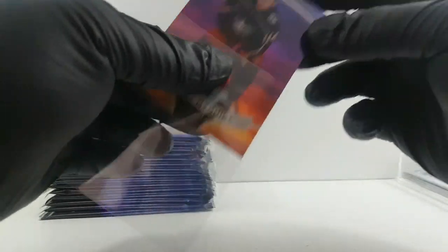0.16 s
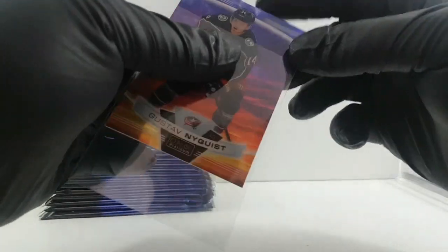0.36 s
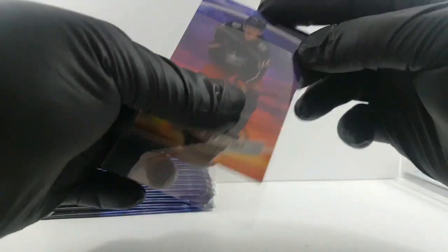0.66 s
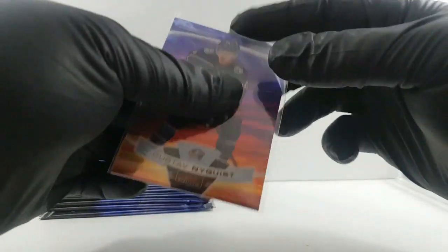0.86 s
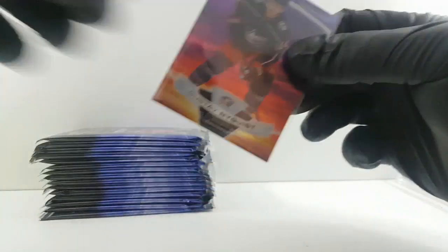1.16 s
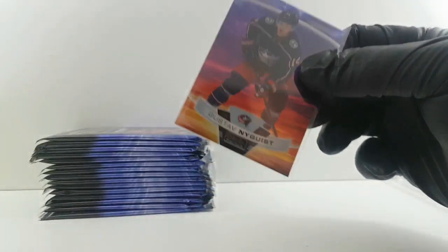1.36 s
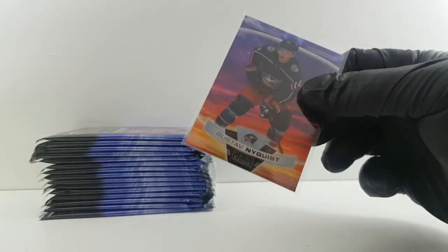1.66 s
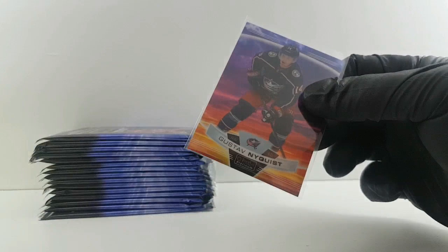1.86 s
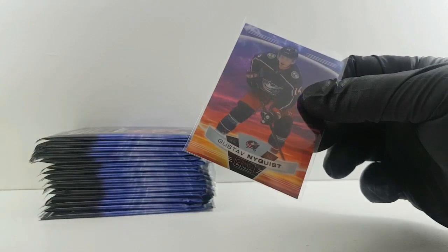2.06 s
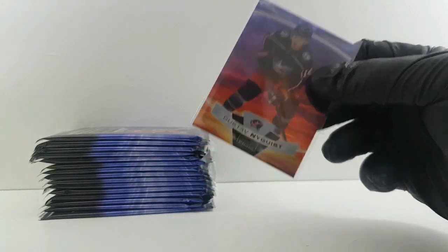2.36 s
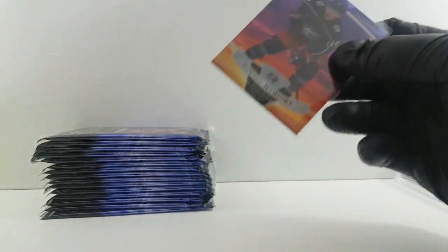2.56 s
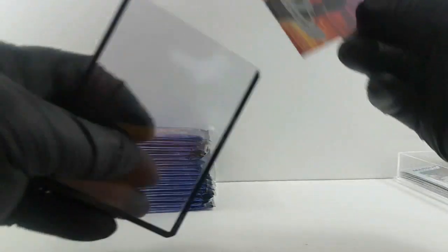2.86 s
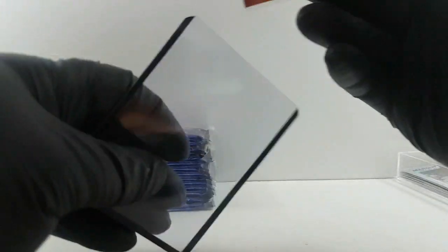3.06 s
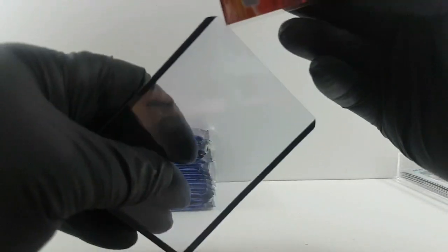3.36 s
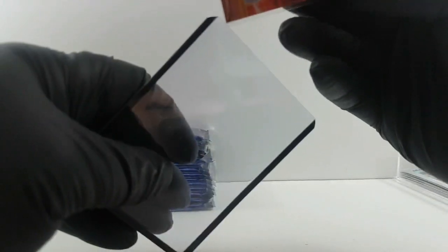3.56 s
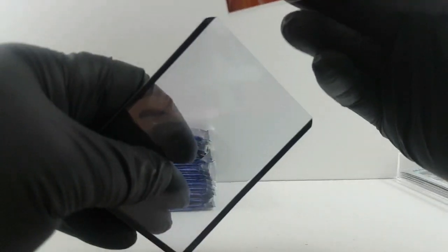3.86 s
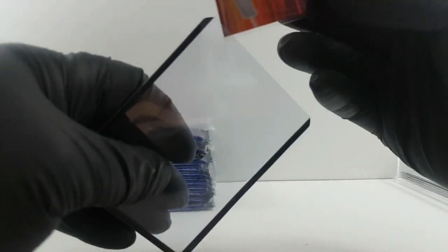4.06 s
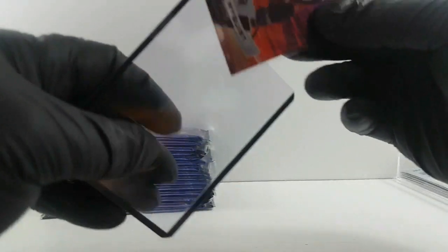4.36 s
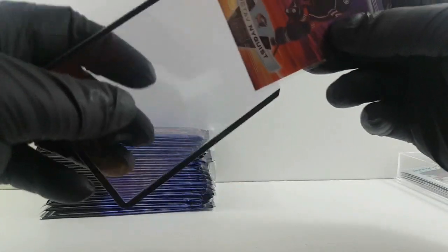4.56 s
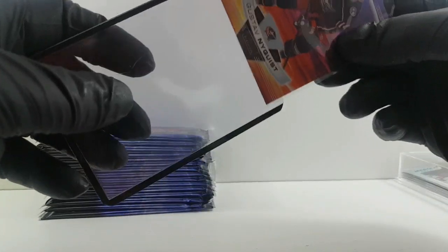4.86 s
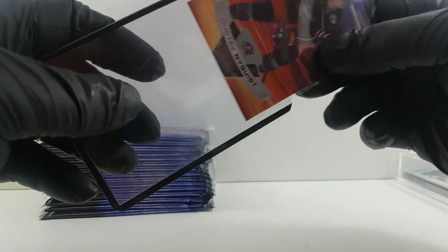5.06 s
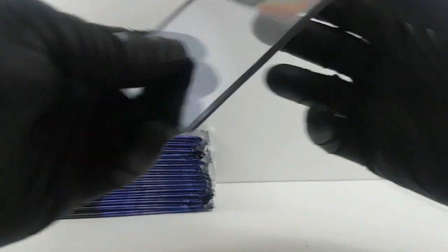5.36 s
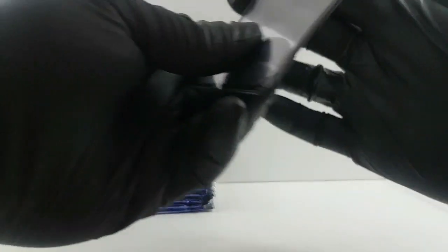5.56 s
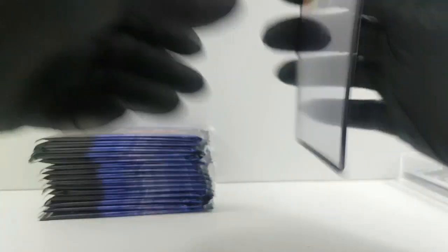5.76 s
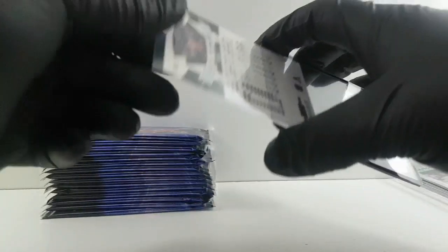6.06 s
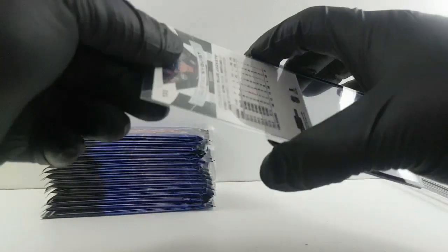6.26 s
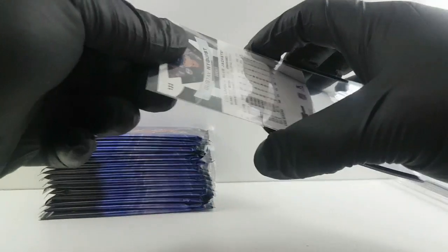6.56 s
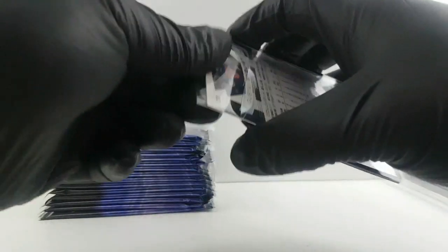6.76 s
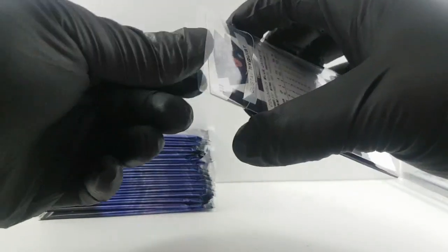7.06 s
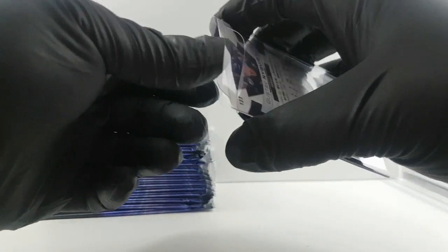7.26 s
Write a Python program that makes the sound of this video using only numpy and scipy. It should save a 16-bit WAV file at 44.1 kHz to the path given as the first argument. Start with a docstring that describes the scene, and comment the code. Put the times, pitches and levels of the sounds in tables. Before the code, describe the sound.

Gloved hands handle a card in thin plastic very close to a phone microphone. Crisp edge ticks and soft low thumps come first, then a busy patch of crackly sliding film around two seconds. A hard holder knocks sharply at about three seconds, followed by near quiet. Handling resumes after five seconds with rustles, clicks and another firm knock near the end. Quiet room air and a faint low rumble lie beneath.

```python
"""A small display booth: gloved hands work close to a phone with two microphone ports, a quiet room behind.
A card goes into a thin sleeve and a hard clear holder is handled. Bursts of tiny slips make the edge ticks;
damped pushes and ringing modes make the knocks, sagging sines the soft fingertip thumps, gliding sines the
squeaks, and streams of slips the sliding plastic. Dense echoes come off the booth walls within milliseconds.
Still air, a low rumble of moving arms and a faint high whine lie underneath."""
import sys
import numpy as np
from scipy import signal
from scipy.fft import rfft, irfft, next_fast_len
from scipy.io import wavfile
from scipy.ndimage import uniform_filter1d

SR = 44100
rng = np.random.default_rng(int(sys.argv[2]) if len(sys.argv) > 2 else 0)


def output_pcm(signal):
    """Save a mono or channel-first signal as 16-bit PCM at the path in sys.argv[1].

    Samples are clipped to [-1, 1] before scaling.
    """
    pcm = np.clip(np.atleast_2d(signal).T, -1, 1) * 32767
    wavfile.write(sys.argv[1], SR, np.round(pcm).astype(np.int16))


N = 327706  # samples in the scene
RING = 4096  # samples in a short sound
AGE = np.arange(RING) / SR  # s since a short sound began


def undb(db):
    """Amplitude ratio for a level in dB."""
    return np.exp(np.asarray(db) * np.log(10) / 20)


def panned(db):
    """Left and right gains for a left-minus-right level difference."""
    return undb(np.array([[db], [-db]]) / 2)


def level(x, db, size=None):
    """Scales x so that its first size samples have this rms level."""
    return x * undb(db) / np.sqrt(np.mean(x[..., :size] ** 2))


def fade(t, t60):
    """Exponential decay by 60 dB in t60 seconds."""
    return undb(-60 * t / t60)


def add(out, s, x):
    """Mixes a short sound in at time s."""
    i = max(int(s * SR), 0)
    out[:, i:i + x.shape[1]] += x[:, :N - i]


def through(x, response):
    """Convolution, cut to the length of x."""
    x = np.atleast_2d(x)
    size = next_fast_len(x.shape[1] + np.shape(response)[-1], True)
    return irfft(rfft(x, size) * rfft(response, size), size)[:, :x.shape[1]]


def band(x, lo, hi, order=3):
    """Butterworth high-pass and low-pass, applied as a causal spectrum."""
    size = next_fast_len(x.shape[-1] + 1024, True)
    s = 1j * (np.arange(size // 2 + 1) + 1e-6) * SR / size
    slope = 1
    for pole in signal.buttap(order)[1]:
        slope = slope * (s / hi - pole) * (lo / s - pole)
    return irfft(rfft(x, size) / slope, size)[..., :x.shape[-1]]


def colour(points, size=512):
    """Causal responses, one for each level column of the (f/Hz, level/dB, ..) points."""
    hz, *columns = np.transpose(points)
    f = np.maximum(np.arange(size // 2 + 1) * SR / size, 1)
    log_gains = np.log(undb([np.interp(np.log(f), np.log(hz), c) for c in columns]))
    # folding the cepstrum onto positive time gives minimum phase
    cepstrum = irfft(log_gains)
    cepstrum[:, 1:size // 2] *= 2
    cepstrum[:, size // 2 + 1:] = 0
    return irfft(np.exp(rfft(cepstrum)))


def smooth_noise(count, *widths):
    """Slow random wander of unit rms: noise averaged over each width in samples."""
    wander = rng.standard_normal(count)
    for width in widths:
        wander = uniform_filter1d(wander, size=width)
    return level(wander, 0)


def diffuse(size, split_hz=550):
    """Stereo noise whose bass is alike on both sides."""
    mid, side = rng.standard_normal((2, size))
    keep = np.exp(-2 * np.pi * split_hz / SR)
    side = signal.lfilter([keep, -keep], [1, -keep], side)
    return np.array([mid + side, mid - side]) / np.sqrt(2)


def slips(size, spread_db):
    """Tiny stick-slip releases of unit rms: many weak ones and a few strong."""
    strength = undb(spread_db * np.minimum(rng.exponential(size=size), 6))
    return level(rng.choice([-1, 1], size) * strength, 0)


def booth(echo_db, t60, lag=0):
    """The direct sound, then dense echoes off the near walls, drawn afresh for each place of the hands."""
    onset = np.clip((AGE - .001) / 0.00024, 0, 1)
    echoes = diffuse(RING) * fade(AGE, t60) * onset
    response = echoes * undb(echo_db) / np.sqrt(np.sum(echoes ** 2) / 2)
    # a positive lag in samples delays the direct sound on the right, a negative one on the left
    lag = int(round(lag))
    response[0, max(-lag, 0)] += 1
    response[1, max(lag, 0)] += 1
    return response


# colour of the booth and the two microphone ports: f/Hz, left level/dB, right level/dB
PORT_COLOUR = [(930, -3, -4), (1466, -7.5, -6), (1900, -1, 0), (2723, -1.5, -7), (3670, -3, 5),
               (4340, 12.5, 1), (4540, -7, 12.5), (5060, 10.5, 6.5), (6000, 15.5, 10.5), (6210, 14, -4.5),
               (6640, 6, -5.5), (7570, -4.5, -13.5), (8650, -14.5, -7), (9760, 4.5, -12), (10750, -0.5, 6),
               (12000, -0.5, 0), (12000, -13.5, -1.5), (15900, -7.5, -7.5)]


def microphone_ports():
    """Booth and port resonances as heard at each side of the phone."""
    return colour(PORT_COLOUR)


# spectrum of the quiet room, relative until ROOM_DB sets the whole: f/Hz, level/dB per Hz
ROOM_SPECTRUM = [(20, 11.5), (50, -8), (90, -7.5), (170, -3), (260, -3.5), (450, -2), (640, 0),
                 (1000, -9.5), (2100, -10.5), (3400, -14), (5000, -16.5), (6000, -17), (8300, -24),
                 (11000, -18.5), (15500, -17)]
ROOM_DB = -67
# arms moving about the table: t/s, rumble level/dB
ARM_RUMBLE = [(0.0, -67), (2.35, -67.5), (3.3, -81.5), (4.6, -104), (5.3, -82.5), (6.86, -70.5),
              (7.4, -104)]


def background():
    """Still room air as coloured noise, and low-passed noise for the rumble of the moving arms."""
    air = level(through(diffuse(N, split_hz=93), colour(ROOM_SPECTRUM, size=8192)), ROOM_DB)
    swell = undb(np.interp(np.arange(N) / SR, *np.transpose(ARM_RUMBLE)))
    return air + swell * level(band(diffuse(N, split_hz=16), 46, 184, order=2), 0)


# a faint electronic whine, the values joined by straight lines: t/s, f/Hz, peak level/dB
WHINE_PATH = [(0, 15900, -98), (3.3, 15680, -82.5), (7.4, 15200, -83)]


def whine():
    """A thin, wavering sine at the edge of hearing that slowly sinks in pitch."""
    s, *columns = np.transpose(WHINE_PATH)
    hz, db = (np.interp(np.arange(N) / SR, s, c) for c in columns)
    waver_hz = 40 * smooth_noise(N, 300)
    return undb(db) * np.sin(2 * np.pi * np.cumsum(hz + waver_hz) / SR)


# strokes of plastic over plastic or glove: start t/s, length t/s,
# then gains at full speed: hiss (about 5.5-8.5 kHz) level/dB, scrape (about 0.4-3.4 kHz) level/dB,
# sheen (above about 10 kHz) level/dB
SLIDING_STROKES = [(0, 0.087, -66.5, -70, -67), (0.133, 0.083, -52.5, -65, -54),
                   (0.17, 0.21, -65, -72, -63), (0.467, 0.19, -68.5, -75, -69), (0.67, 0.15, -62, -68, -58),
                   (0.989, 0.26, -60.5, -61, -61.5), (1.215, 0.4, -70, -76, -72.5),
                   (1.716, 0.083, -63, -62.5, -66), (1.74, 0.49, -63, -64.5, -68.5),
                   (1.799, 0.067, -50.5, -55.5, -51), (1.844, 0.023, -58, -45.5, -53),
                   (1.899, .1, -59, -56, -61), (1.993, 0.066, -58.5, -60, -62),
                   (2.099, 0.042, -50, -56, -55), (2.158, 0.2, -55, -56.5, -57.5),
                   (2.208, 0.063, -42, -71, -41.5), (2.334, .18, -58, -68, -58),
                   (2.478, .14, -52.5, -61, -55), (2.575, 0.33, -65, -68.5, -65.5),
                   (2.797, 0.16, -58, -60.5, -59.5), (3.005, .14, -60.5, -66.5, -61.5),
                   (3.084, 0.44, -79, -73.5, -87), (4.22, 0.44, -63.5, -77, -63),
                   (4.895, 0.41, -59, -73, -56.5), (5.267, 0.15, -56, -62.5, -59),
                   (5.393, 0.21, -65, -67.5, -66), (5.611, 0.14, -58, -66.5, -58.5),
                   (5.654, 0.087, -54, -54, -52.5), (5.719, 0.078, -49, -47, -48.5),
                   (5.758, 0.26, -63.5, -71, -64.5), (6.046, 0.084, -63.5, -62.5, -65),
                   (6.271, 0.12, -66, -69.5, -67), (6.573, .1, -57, -60, -59.5),
                   (6.631, 0.33, -55.5, -61, -56), (7.151, .19, -57.5, -58.5, -60.5),
                   (7.306, 0.46, -60, -65.5, -62)]
# share of a stroke in which the hand speeds up; loudness is a power of its speed
SWELL_SHARE, SPEED_POWER = 0.4, 0.88


def stroke_gains():
    """Hiss, scrape and sheen over time: each stroke swells and dies away with the speed of the hand."""
    t = np.arange(N) / SR
    gains = np.zeros((3, N))
    for start, length, *db in SLIDING_STROKES:
        u = t[:int(length * SR)] / length
        speed = np.sin(np.pi * np.interp(u, [0, SWELL_SHARE, 1], [0, .5, 1]))
        add(gains, start, undb(db)[:, None] * speed ** SPEED_POWER)
    return gains


# ringing modes of the hard holder, before detuning, levels relative: f/Hz, level/dB, 60 dB decay t/s
HOLDER_MODES = [(205, -19, .08), (356, -12, .07), (440, -4, .06), (464, 0, .08), (582, -6, .09),
                (680, -13, .1), (760, -14, .07), (865, -12, .08), (1060, -16, .08), (1150, -13, .09),
                (1420, -17, .07), (1750, -15, .09), (1870, -11, .05), (2280, -20, .08)]


def holder_ring():
    """The holder's decaying modes, a little detuned by each new grip; unit energy."""
    hz, db, t60 = np.transpose(HOLDER_MODES)[:, :, None]
    hz = hz * (1 + 0.018 * rng.standard_normal(hz.shape))
    ring = np.sum(undb(db) * fade(AGE, t60) * np.sin(2 * np.pi * hz * AGE), axis=0)
    return ring / np.sqrt(np.sum(ring ** 2))


def rubbing(ports, gains, judder_db=1.5, uneven_db=1.24, grain_db=5, scatter_t60=0.063):
    """Sliding plastic: a juddering stream of slips hisses off the film and sounds the holder."""
    hiss, scrape, sheen = gains
    judder = smooth_noise(N, 260, 130)
    force = slips(N, grain_db) * undb(judder_db * judder)
    pressure = undb(uneven_db * smooth_noise(N, 900, 500))
    # the contact point keeps moving, so each slip scatters off the walls in its own way
    scattered_energy = np.abs(through(force ** 2, fade(AGE, scatter_t60) ** 2))
    grains = pressure * diffuse(N) * np.sqrt(scattered_energy)
    film = through(grains, ports)
    plate = grains + undb(-10) * through(grains, holder_ring())
    return (hiss * level(band(film, 5500, 8540), 0)
            + sheen * level(band(film, 10250, 18000, order=5), 0)
            + scrape * level(band(plate, 445, 3420, order=2), 0))


THUMP_LAG = 14  # samples by which a thump's direct sound reaches the right port later


def thump(db, hz, scuff_db, t60=0.057, scuff_t60=0.025, flutter_db=-6, sag=0.062):
    """A fingertip flexes the plastic, its pitch sagging through hz; the glove flutters and scuffs."""
    sagging_hz = hz * (1 + sag * (2 * np.exp(-AGE / 0.0054) - 1))
    phase = 2 * np.pi * np.cumsum(sagging_hz) / SR
    press = 1 - np.exp(-AGE / 0.00099)
    flutter = level(band(diffuse(RING, split_hz=170), 31, 264), flutter_db)
    flexing = (np.sin(phase) + flutter) * press * fade(AGE, t60)
    flex = through(flexing, booth(echo_db=-3, t60=0.21, lag=THUMP_LAG))
    scuffing = slips(RING, 7.5) * press * fade(AGE, scuff_t60)
    scuff = through(scuffing, booth(echo_db=13.0, t60=0.066) + undb(-1) * holder_ring())
    return level(flex, db, size=880) + level(band(scuff, 576, 425, order=2), scuff_db, size=880)


# fingertips landing on the held plastic: t/s, flex level/dB, mid-sag f/Hz, scuff level/dB
FINGERTIPS = [(0.044, -66, 210, -63), (0.132, -57.5, 276, -62), (0.559, -54, 226, -65.5),
              (0.593, -57, 203, -69), (0.82, -53, 226, -77), (0.992, -45, 288, -36),
              (1.007, -35.5, 219, -52), (1.18, -48.5, 200, -57.5), (1.816, -45.5, 217, -59),
              (1.833, -37, 198, -46), (1.853, -48, 246, -41.5), (1.911, -44, 217, -47),
              (1.944, -36, 243, -48), (1.957, -31.5, 244, -41), (2.016, -44.5, 300, -50),
              (2.043, -51, 300, -53), (2.109, -56.5, 358, -49.5), (2.306, -37.5, 291, -42.5),
              (2.344, -35.5, 182, -67), (2.84, -40, 335, -47), (2.993, -52.5, 360, -59),
              (3.157, -57, 208, -79), (3.682, -51, 217, -68), (5.165, -56.5, 218, -59),
              (5.193, -46, 382, -39), (5.205, -48, 233, -50), (5.329, -57.5, 216, -80),
              (5.766, -56.5, 383, -49), (5.971, -62, 245, -66), (6.043, -53, 390, -42.5),
              (6.06, -43.5, 222, -48.5), (6.245, -62, 195, -84), (6.327, -45.5, 358, -41.5),
              (6.843, -48.5, 218, -68)]
# each settles a moment (s) after landing, softer (dB) and lower (pitch ratio)
SETTLE_S, SETTLE_DB, SETTLE_PITCH = 0.025, -10.5, 0.754


def thumps(settle_scuff_db=-14):
    """Each fingertip lands on the plastic, then settles with a second, softer flex."""
    out = np.zeros((2, N))
    for s, db, hz, scuff_db in FINGERTIPS:
        add(out, s, thump(db, hz, scuff_db))
        settled = thump(db + SETTLE_DB, hz * SETTLE_PITCH, scuff_db + settle_scuff_db)
        add(out, s + SETTLE_S, settled)
    return out


ONSET_S = .01  # where the onset lies within a tick, s


def tick(ports, edge_db, body_db, sheen_db, length, pan, grain_db=4, swell_db=-17, swell_s=0.00042):
    """A plastic edge slips in a short flurry, with a faint, very short swell of noise around its onset."""
    rise = np.maximum(AGE - ONSET_S, 0) / length
    swell = undb(swell_db) * np.exp(-np.abs(AGE - ONSET_S) / swell_s)
    force = slips(RING, grain_db) * (rise * np.exp(1 - rise) + swell)
    flurry = through(through(force, booth(echo_db=1.5, t60=0.06)), ports) * panned(pan)
    return (level(band(flurry, 6050, 5750, order=4), edge_db, size=880)
            + level(band(flurry, 1125, 3300), body_db, size=880)
            + level(band(flurry, 7370, 21000, order=5), sheen_db, size=880))


# ticks of the sleeve edges: onset t/s, edge (around 6 kHz) level/dB, body (about 1.1-3.3 kHz) level/dB,
# sheen (above about 7.4 kHz) level/dB, slip length t/s, left minus right level/dB
SLEEVE_TICKS = [(0.13, -66, -63, -65, .0028, 3), (0.252, -76, -88, -66, 0.0011, -10),
                (0.695, -61.5, -71, -55, 0.0029, -6), (0.796, -43.5, -59, -38.5, .0022, -1),
                (0.8036, -39, -62.5, -45, 0.001, 2), (0.901, -31.5, -47.5, -44, 0.002, 12),
                (0.9027, -36.5, -44.5, -38, .0013, -7), (0.991, -46.5, -44, -61, 0.0017, 4),
                (1.114, -66, -64, -75, .002, 2), (1.171, -53, -56, -58, 0.0031, 5),
                (1.614, -56.5, -65, -68, 0.0076, 0.5), (1.639, -54, -56.5, -58, 0.00091, 5),
                (1.804, -51.5, -51, -73, 0.0016, 2), (1.906, -49.5, -56, -55, 0.00056, 4),
                (1.944, -47.5, -49.5, -57, 0.0028, 2), (1.978, -50, -54, -57, 0.0014, 6),
                (2.197, -44, -58, -52, 0.00045, 3), (2.303, -45.5, -45, -54.5, 0.0016, 4),
                (2.878, -44.5, -75, -51, 0.0005, 1), (2.962, -38.5, -49, -40.5, 0.00093, -4),
                (3.025, -56.5, -89, -60.5, 0.00048, -3), (5.2183, -49, -55, -54, 0.0027, -3),
                (5.325, -51.5, -61, -50.5, 0.00091, 10), (5.761, -41.5, -47.5, -45.5, 0.0024, -3),
                (6.073, -59, -61.5, -54, .0027, -8), (6.13, -64, -65.5, -68, 0.0023, 0),
                (6.177, -67.5, -68, -84, .0015, 4), (6.331, -47, -40, -38.5, 0.002, -2),
                (6.358, -42, -50, -38.5, 0.00051, -1), (7.035, -45, -55.5, -45.5, 0.0045, -0.5),
                (6.412, -62, -63, -58.5, 0.00092, -10), (6.77, -56, -53, -63, 0.0024, -2),
                (6.913, -70, -69, -67, 0.0012, 0), (7.229, -52, -63, -55.5, 0.00057, -2)]


def ticks(ports):
    """The sleeve's distinct ticks; each has its own brightness."""
    out = np.zeros((2, N))
    for s, *flurry in SLEEVE_TICKS:
        add(out, s - ONSET_S, tick(ports, *flurry))
    return out


# body and sheen of a click or crinkle relative to its edge, dB
CLICK_BODY_DB, CLICK_SHEEN_DB = -4, -6
# stray crinkles: how often, and level relative to the sliding hiss gain
CRINKLES_PER_S, CRINKLE_DB = 3.8, -2
# light shifts of the grip: how often, and level relative to the arms' rumble
TOUCHES_PER_S, TOUCH_DB = 4, 6


def fidgets(ports, hiss, touch_hz=205, touch_scuff_db=-11, crinkle_s=0.0017):
    """At random, edge slips crinkle the sliding sleeve and soft flexes follow the arms as the grip shifts."""
    out, duration = np.zeros((2, N)), N / SR
    for when, pan in rng.random((int(CRINKLES_PER_S * duration), 2)):
        crinkle = tick(ports, 0, CLICK_BODY_DB, CLICK_SHEEN_DB, crinkle_s, 10 * (pan - .5))
        add(out, when * duration, crinkle * undb(CRINKLE_DB) * hiss[int(when * N)])
    for when, pitch in rng.random((int(TOUCHES_PER_S * duration), 2)):
        db = np.interp(when * duration, *np.transpose(ARM_RUMBLE)) + TOUCH_DB
        hz = touch_hz * 2 ** (pitch - .5)  # within half an octave either way
        add(out, when * duration, thump(db, hz, db + touch_scuff_db))
    return out


# knocks on the holder: t/s, level/dB, contact f/Hz, rattle level/dB relative to the push,
# edge click level/dB, left minus right level/dB, lag of the right port/samples
HOLDER_KNOCKS = [(0.7674, -48, 680, -25, -49.5, 0, 11.5), (0.904, -57, 590, -20, -73, -2, 3),
                 (1.083, -49, 646, -27, -55.5, 0, 5), (1.669, -57, 710, -10, -66.5, -2, 12.5),
                 (2.635, -56, 514, -21, -69, 1, 11), (2.77, -56, 696, -7, -63, 0, 16),
                 (2.833, -35, 573, 0.5, -50, -1.5, 12.5), (3.0645, -24.5, 834, -8.5, -62, -0.5, 13),
                 (3.1923, -45.5, 850, -8.5, -57, 0, 9.5), (3.27, -58, 700, -16, -82, -2, 15),
                 (3.927, -51.5, 595, -19, -58, 1.5, 15), (4.534, -61.5, 650, -19, -78, -3, 2),
                 (4.719, -62.5, 830, -26, -54, 0.5, -4), (4.797, -61.5, 960, -5, -65, -1, 5),
                 (5.192, -38, 624, 4, -47.5, -1, 13), (5.696, -48, 970, -20, -51, -1, -8),
                 (6.329, -36, 574, 0, -58, 1, -3), (6.419, -57.5, 1150, -8, -60.5, 2, -7),
                 (6.607, -51.5, 1320, -20, -44.5, 0.5, -18), (6.744, -28.5, 960, -9.5, -59, 0.5, -9.5),
                 (6.822, -44, 2000, -18, -47, 2, -1.5), (6.84, -42, 900, -3, -51, 3, -10)]
CLICK_S = 0.00078  # slip length of the click that starts a knock, s


def knocks(ports, cycles=0.23, ring_db=-5, ring_delay=0.0022, low_hz=170):
    """An edge clicks, pushes the holder briefly and rattles; the whole plate takes up the ring a moment later."""
    out = np.zeros((2, N))
    for s, db, hz, rattle_db, click_db, pan, lag in HOLDER_KNOCKS:
        turn = hz * AGE
        push = level(turn ** 3 * np.exp(-turn / cycles) * np.sin(2 * np.pi * turn), 0)
        rattling = slips(RING, 7) * AGE * fade(AGE, 0.015)
        rattle = level(band(rattling, 1250, 2000, order=5), rattle_db)
        strike = through(push + rattle, booth(echo_db=-2.0, t60=0.051, lag=lag))
        # a shorter, higher contact drives the deep modes less
        swell = 1 - np.exp(-(AGE / ring_delay) ** 2)
        driven_modes = band(holder_ring() * swell, 0.55 * hz, 5000, order=2)
        ring = through(driven_modes, booth(echo_db=0, t60=0.0083, lag=lag))
        struck = band(level(strike, 0) + level(ring, ring_db), low_hz, 7200, order=1)
        knock = through(struck, ports) * panned(pan)
        click = tick(ports, click_db, click_db + CLICK_BODY_DB, click_db + CLICK_SHEEN_DB, CLICK_S, pan)
        start = s - .0007
        add(out, start, level(knock, db, size=440))
        add(out, start - ONSET_S, click)
    return out


# glove squeaks on the plastic: t/s, length t/s, start f/Hz, end f/Hz, level/dB
GLOVE_SQUEAKS = [(2.015, 0.035, 1170, 1160, -59), (2.113, 0.018, 2770, 2500, -52.5),
                 (4.271, 0.065, 12800, 8900, -61), (4.433, 0.051, 15500, 13400, -64)]


def squeaks():
    """Rubber sticks and slips: an unsteady sine whose pitch falls as the finger slows."""
    out = np.zeros((2, N))
    for s, length, start_hz, end_hz, db in GLOVE_SQUEAKS:
        u = np.linspace(0, 1, int(length * SR))
        unsteady = 1 + .04 * smooth_noise(len(u), 40)
        hz = (start_hz + (end_hz - start_hz) * u ** 2) * unsteady
        tone = np.sin(2 * np.pi * np.cumsum(hz) / SR) * np.sin(np.pi * u)
        add(out, s, level(through(tone, booth(echo_db=3, t60=0.089)), db))
    return out


def room_tail(x, low_db=-19, high_db=-21, low_t60=0.32, high_t60=0.27):
    """The room beyond the booth rings on faintly as decaying noise, longest in the bass."""
    t = np.arange(SR) / SR
    noise = diffuse(SR) * np.clip(t / 0.023, 0, 1)

    def unit_tail(t60):
        """Noise decaying in t60, with unit energy per side on average."""
        tail = noise * fade(t, t60)
        return tail / np.sqrt(np.sum(tail ** 2) / 2)

    low = band(unit_tail(low_t60), 64.3, 790, order=2)
    high = band(unit_tail(high_t60), 1100, 6000, order=1)
    return through(x, undb(low_db) * low + undb(high_db) * high)


def scene():
    """The hands close by, their tail in the room, and the background with its whine."""
    ports, gains = microphone_ports(), stroke_gains()
    hands = rubbing(ports, gains) + thumps() + ticks(ports)
    hands = hands + fidgets(ports, gains[0]) + knocks(ports) + squeaks()
    return background() + whine() + hands + room_tail(hands)


TOP_HZ = 15900  # upper limit of the phone


def record(dry):
    """The phone cuts the top with a steep elliptic low-pass."""
    return signal.sosfilt(signal.ellip(10, .2, 80, TOP_HZ, fs=SR, output="sos"), dry)


dry = scene()
out = record(dry)
output_pcm(out)
```